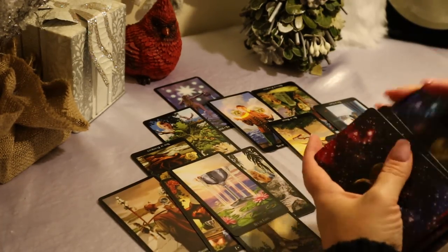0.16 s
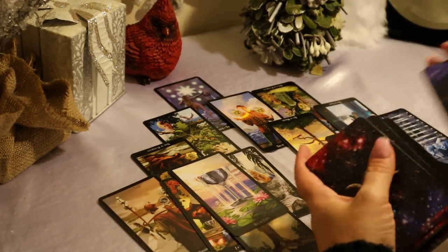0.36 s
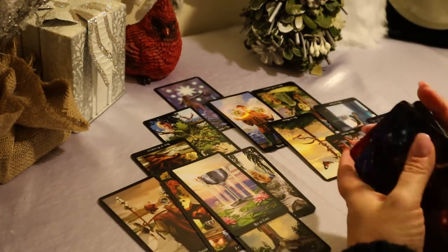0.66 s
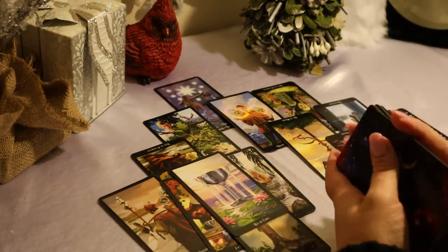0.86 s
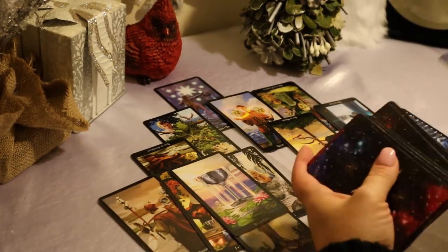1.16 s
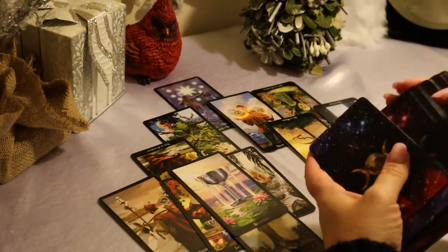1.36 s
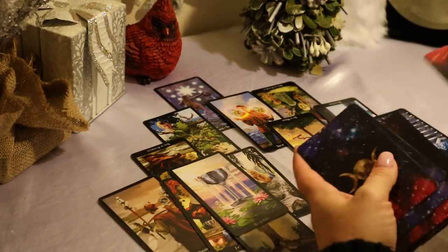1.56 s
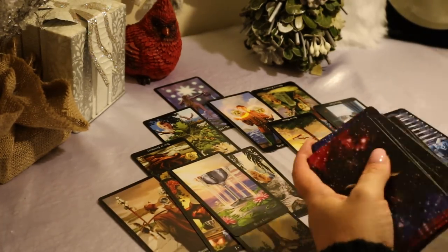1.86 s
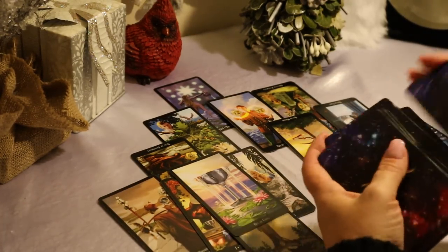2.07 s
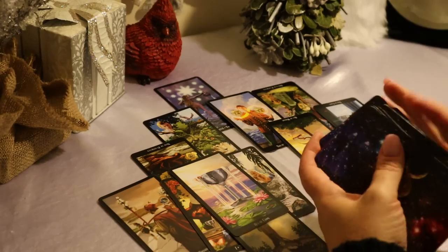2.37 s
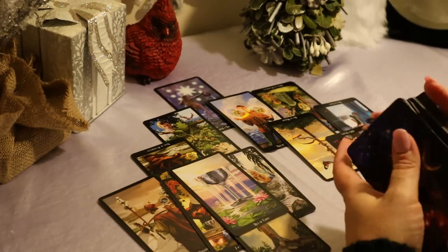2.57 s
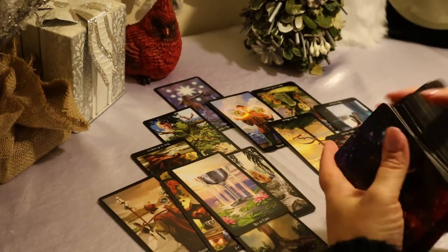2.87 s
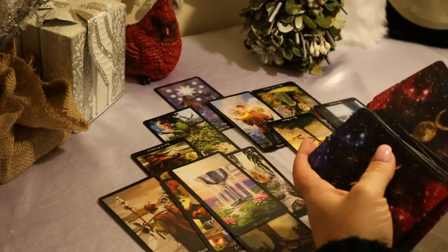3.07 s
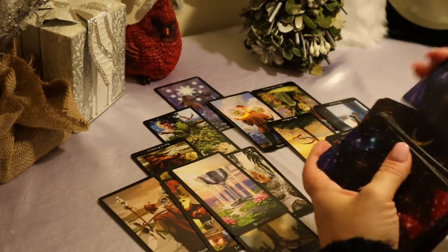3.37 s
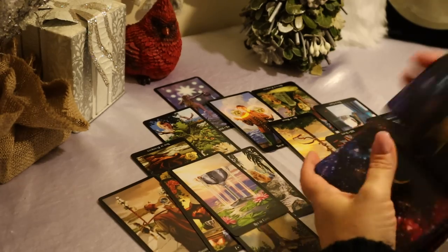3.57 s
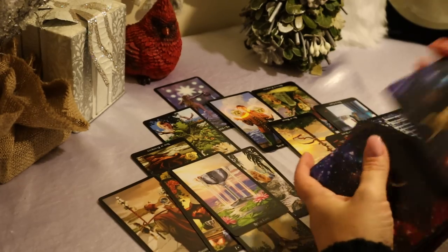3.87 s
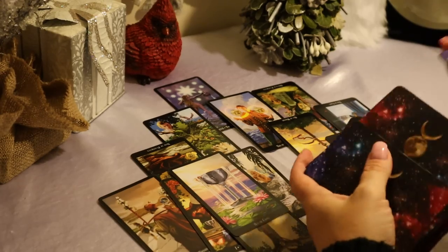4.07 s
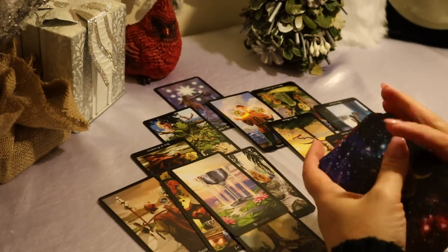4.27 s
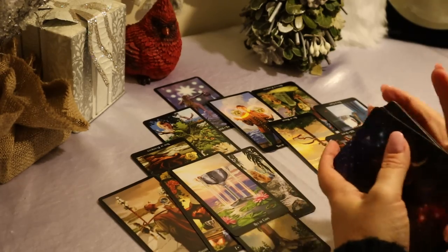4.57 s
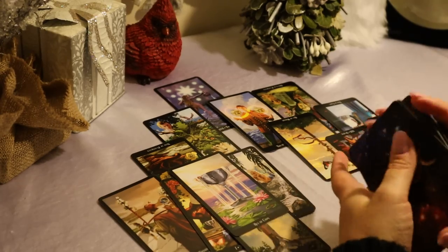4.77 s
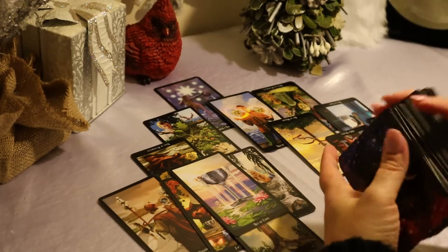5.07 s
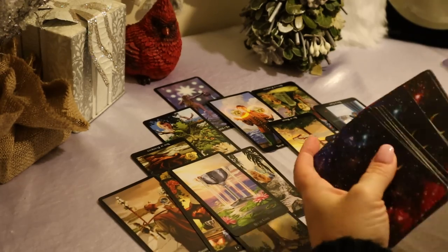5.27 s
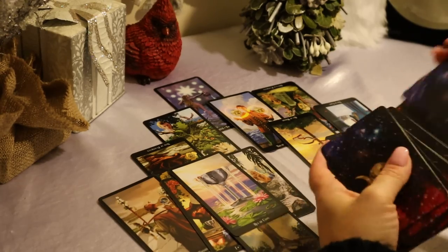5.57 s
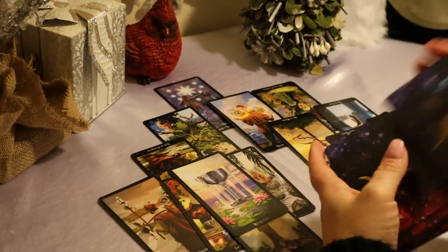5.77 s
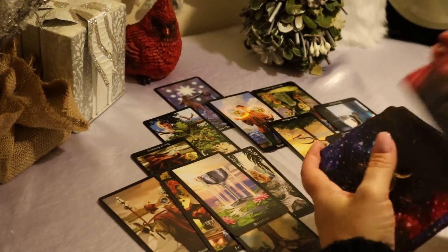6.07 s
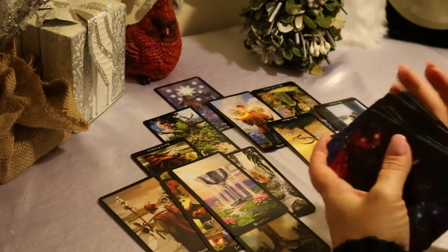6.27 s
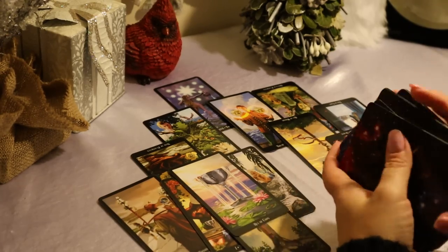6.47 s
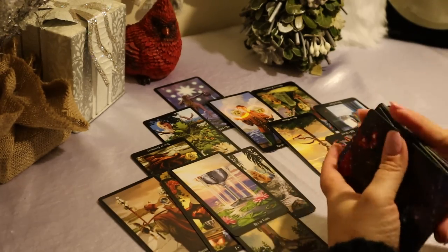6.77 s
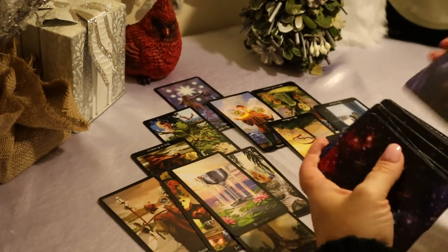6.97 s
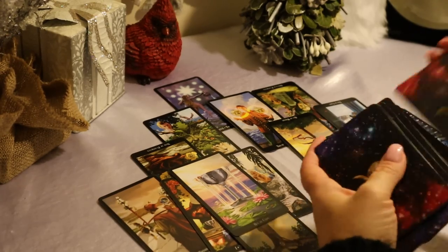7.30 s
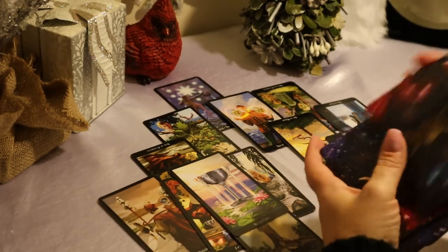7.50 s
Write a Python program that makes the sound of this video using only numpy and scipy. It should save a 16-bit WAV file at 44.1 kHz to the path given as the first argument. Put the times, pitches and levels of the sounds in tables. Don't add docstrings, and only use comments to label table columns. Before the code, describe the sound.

A deck of large stiff cards is shuffled overhand at close range. Packets slide with gritty, papery hiss, then edges tick and slap home with dry knocks. Hard cracks stand out near two, three and four seconds, followed by softer finger rustles and a near-still pause before more flicks around six seconds. Small furnished room, very short reflections, faint hum and microphone hiss, close stereo pickup.

```python
import sys
import numpy as np
from scipy import signal
from scipy.fft import rfft, irfft, next_fast_len
from scipy.io import wavfile
from scipy.ndimage import uniform_filter1d

SR = 44100
rng = np.random.default_rng(int(sys.argv[2]) if len(sys.argv) > 2 else 0)


def store_wav(level_fs):
    pcm = np.round(np.clip(np.atleast_2d(level_fs), -1, 1) * 32767)
    wavfile.write(sys.argv[1], SR, pcm.T.astype(np.int16))


def convert_level_to_amplitude(level_db):
    exponent = np.asarray(level_db, float) / 20
    return 10 ** exponent


N = 336924

# frequency in Hz, level in dB per Hz.
AIR_SPECTRUM = [(18, -16), (36, -1.5), (684, -6), (913, -8.5), (3310, -16), (9460, -28.5), (11400, -28),
                (12600, -27), (13700, -30), (16000, -69)]
AIR_DB = -55
ROOM_T60_S, ROOM_DB = 0.14, -15

# frequency in Hz, level in dB.
SCATTER_SPECTRUM = [(200, -22), (600, -20), (1200, -13), (2500, -10), (4500, -7), (9000, -3)]

# pitch in Hz, width in Hz, level in dB.
DECK_LOW_MODES = [(67.4, 44, -13), (162, 107, -7), (350.5, 39, -5.5), (530, 110, -4), (630, 100, -5),
                  (800, 70, -4), (1045, 90, -8)]
# pitch in Hz, width in Hz, level in dB.
DECK_HIGH_MODES = [(1396, 75, -3.5), (1710, 89, -4.5), (1800, 49, -6), (1960, 94, -5.5), (2170, 110, -8),
                   (2390, 130, -12), (2620, 93, -20), (3400, 160, -6)]

# frequency in Hz, level in dB.
RUB_SPECTRUM = [(60, -11.5), (300, -9.5), (620, -6.5), (1000, -8), (1800, -2), (2600, -4), (3500, -51),
                (6000, -34.5)]
# frequency in Hz, level in dB.
SCRAPE_SPECTRUM = [(2000, -29), (2900, -0.5), (5500, -3.5), (7500, -24.5)]
# frequency in Hz, level in dB.
EDGE_SPECTRUM = [(4500, -62), (6200, -4.5), (11000, -3.5), (13000, -4.5), (16000, -5.5)]

# start in seconds, level in dB, time to fade in seconds, edge hiss in dB relative.
SKIDS_OF_PACKETS = [(0.0, -50.5, 0.018, -6), (0.519, -39, 0.13, -5), (0.913, -46, .1, -1.5),
                    (1.23, -41.5, .03, 0), (1.763, -30, .12, -12), (2.102, -37, .12, 2),
                    (2.385, -32, 0.076, -1), (4.004, -46.5, 0.029, 7), (4.071, -43, .17, 1),
                    (6.21, -43.5, 0.049, 5.5), (7.308, -38, 0.058, 1)]
# start in seconds, level in dB, time to fade in seconds.
DECK_SETTLES = [
    (0.314, -26.5, 0.056),
    (2.171, -29, .06),
    (3.823, -27.5, .035),
    (4.165, -35, .04),
]
# start in seconds, length in seconds, first level in dB, last level in dB, edge hiss in dB relative.
DRIVEN_PACKETS = [
    (0.209, 0.1, -41, -50, 2),
    (1.427, 0.12, -50.5, -52.5, 3.5),
    (0.714, 0.091, -57, -54, 0.5),
    (2.577, 0.096, -58.5, -55, 1),
    (3.708, 0.024, -52, -44, 3),
    (3.297, 0.049, -35, -37.5, -2.5),
    (4.335, 0.024, -35.5, -32, 7.5),
    (5.577, .11, -48, -47, 3),
    (5.906, .035, -47, -47, -1),
]
# start in seconds, length in seconds, first level in dB, last level in dB, edge hiss in dB relative.
DRAWN_PACKETS = [(1.148, .075, -59, -55.5, 13), (4.326, .01, -51, -43, -7), (1.831, 0.03, -56, -55, -1),
                 (2.88, .24, -70.5, -59.5, 9), (3.391, .055, -49, -49, -5), (3.78, 0.039, -47, -48, 4.5),
                 (4.527, 0.17, -62, -62, 0.5), (5.118, 0.16, -68, -59, 4), (5.944, 0.041, -49.5, -56, 4),
                 (6.413, .13, -58, -58, 0), (6.975, .1, -62, -64, 6.5), (7.34, .07, -49, -48, 3)]
# peak in seconds, level in dB, times to rise and to fade in seconds, edge hiss in dB relative.
CARD_BRUSHES = [(0.134, -62, 0.054, .04, 0), (0.468, -53, .03, .035, -11), (0.599, -40.5, 0.047, .04, -11),
                (0.765, -46.5, 0.064, 0.052, -4), (0.248, -47, .06, .05, 9.5),
                (1.452, -44, .035, .09, 11.5), (1.54, -46.5, .08, 0.049, 4), (1.33, -62, .05, 0.042, 6),
                (1.005, -62.5, .05, 0.057, 9), (1.98, -64.5, 0.043, 0.043, 7), (1.697, -54, .04, .04, 2),
                (2.455, -48, .05, .03, -14), (2.655, -52, 0.057, 0.086, 3.5),
                (2.802, -51.5, 0.06, 0.036, 5.5), (3.28, -40.5, 0.023, .05, -17),
                (3.606, -62, 0.027, 0.059, 3.5), (3.744, -31.5, 0.025, 0.051, 1.5),
                (4.036, -31, 0.012, .045, -3), (4.246, -59, 0.021, 0.016, 13), (4.834, -55, 0.094, 0.12, 7),
                (4.966, -50, 0.056, 0.078, 5), (6.017, -39, .05, 0.042, 2),
                (6.249, -37.5, 0.028, 0.067, -12.5), (6.612, -58, 0.035, .2, 3.5)]
# peak in seconds, level in dB, time to rise in seconds, edge hiss in dB relative.
FINGER_RUSTLES = [(2.13, -42, .04, 4), (2.172, -45, .04, -3), (4.413, -49.5, .04, -8), (6.42, -52, .05, 3),
                  (6.51, -50, .1, 1), (7.346, -44, .05, 5), (5.69, -44, .05, 0), (7.405, -44, .07, 3),
                  (3.452, -44, .07, -2), (7.055, -60, .06, 6), (4.525, -54, 0.043, -1),
                  (4.575, -52, .05, -10), (4.65, -52, 0.12, 2.5), (4.697, -53, .03, 3),
                  (4.94, -62, 0.036, 8), (5.23, -54, .15, -3), (5.287, -54, .08, 12.5),
                  (6.285, -52, .04, -5), (6.72, -58, 0.037, 3)]

FADE_DB = 25
STRIKE_S, EASE_S = .002, 0.042
DRIVE_FADE_S, DRAW_FADE_S, RUSTLE_FADE_S = 0.043, 0.042, .045
SETTLE_EDGE_DB = -34.5
SCRAPE_DB, SCRAPE_PER_EDGE = 0.42, 0.43
DULLING = .4

# start in seconds, snap peak in dB, snap pitch in Hz, thud in dB relative.
EDGE_TICKS = [(0.2119, -23, 2540, -15.5), (0.2504, -29, 2560, -15), (0.5213, -28, 1960, -4.5),
              (1.4272, -36, 1810, -4), (1.4519, -21, 2460, -28), (2.1046, -26, 2180, -2),
              (2.1264, -27, 2130, -13), (2.417, -26.5, 2390, -12.5), (2.797, -41, 1890, -10.5),
              (3.12, -45.5, 1300, 1), (3.3339, -19, 1440, -28), (3.708, -39, 2860, -5.5),
              (4.0056, -37, 2130, -10.5), (4.0348, -20, 3600, -20), (4.0701, -12, 2500, -28),
              (2.618, -42, 3000, -20), (4.2433, -48, 3330, -25), (4.336, -21.5, 1980, -15.5),
              (5.4014, -48, 1470, -16), (5.5759, -44.5, 1550, -7), (5.907, -27, 3460, -37),
              (5.9404, -28.5, 1710, -14), (6.2111, -34, 1700, -9.5), (6.2446, -24.5, 2310, -25),
              (6.4018, -40.5, 2650, -10), (7.6334, -30.5, 1270, -12)]
# start in seconds, snap peak in dB, snap pitch in Hz, thud in dB relative.
FACE_FLICKS = [(0.5521, -20, 3480, -17), (0.7103, -42.5, 1920, -10), (1.4955, -34, 1590, -14),
               (1.7674, -24, 2300, -30), (1.8672, -37.5, 2100, -3.5), (2.1004, -31, 3370, -27),
               (2.1414, -30.5, 2390, 0), (2.4538, -27.5, 2920, -12.5), (3.2743, -40, 2100, -7),
               (3.3414, -16, 2620, -27.5), (3.7394, -22, 1560, -23), (3.824, -33.5, 1740, 4),
               (4.1634, -30, 1850, -6), (4.6516, -38.5, 1710, -17), (4.6887, -42.5, 1220, -13),
               (5.9314, -24, 2070, -18), (6.0163, -26.5, 2760, -19), (6.2514, -21.5, 2500, -24.5),
               (6.6134, -52, 1299, 8), (7.3831, -36.5, 1930, -6.5), (7.3966, -30.5, 1390, -9)]
# start in seconds, snap peak in dB, snap pitch in Hz, thud in dB relative.
PACKET_SLAPS = [(0.3137, -24, 1810, -5), (0.3214, -28, 2270, -2), (0.4658, -41.5, 1740, -12),
                (0.538, -34.5, 1560, 0.5), (0.6005, -32.5, 1170, 1), (0.9166, -33, 2510, -35),
                (1.2291, -33, 1420, -1.5), (1.5484, -30.5, 3730, -7), (1.6906, -47, 1740, -22),
                (1.762, -1.5, 4000, -54), (2.1695, -25.5, 1800, -2.5), (2.3856, -14.5, 1800, -19),
                (2.5764, -35, 4360, -19), (3.2974, -10.5, 2800, -52), (3.3104, -13.5, 1960, -32),
                (3.4456, -28, 1420, -23), (3.7484, -23.5, 2090, -18), (4.4118, -31.5, 1570, -22),
                (4.5174, -40, 1180, -7), (4.57, -36, 2340, -28), (5.6161, -32.5, 2170, -8.5),
                (5.6868, -24.5, 3700, -20), (7.3033, -28.5, 1900, -15.5)]
TICK_TOP_DB, FLICK_TOP_DB, SLAP_TOP_DB = -3, -10, -25
CHATTER_T60_S = 0.033


def unit(x):
    return x / np.sqrt(np.mean(x ** 2))


def colour(x, points):
    hz, db = np.transpose(points)
    size = next_fast_len(x.shape[-1])
    f = np.fft.rfftfreq(size, 1 / SR) + 1
    gain = convert_level_to_amplitude(np.interp(np.log(f), np.log(hz), db))
    return irfft(rfft(x, size) * gain, size)[..., :x.shape[-1]]


def ring(x, hz, width):
    return signal.lfilter(*signal.iirpeak(hz, hz / width, fs=SR), x)


def body(x, modes, grip=1):
    return sum(convert_level_to_amplitude(db) * ring(x, grip * hz, width) for hz, width, db in modes)


def walk(rate):
    k = int(SR / rate)
    held = np.repeat(rng.standard_normal(N // k + 1), k)
    return 1.175 * uniform_filter1d(held, k)[:N]


def grit(shape, spread_db):
    jumps = convert_level_to_amplitude(spread_db * rng.exponential(size=shape))
    return unit(rng.standard_normal(shape) * jumps)


def air():
    common, own = rng.standard_normal(N), rng.standard_normal((2, N))
    hum = colour(common, [(30, 3.5), (150, -3.5), (400, -5), (1000, -57)])
    hiss = colour(own, [(30, -19), (100, 3.5), (300, 1.5), (1000, 2.5)])
    return convert_level_to_amplitude(AIR_DB + 1.48 * walk(3.105)) * unit(colour(hum + hiss, AIR_SPECTRUM))


def echoes():
    t = np.arange(SR // 2) / SR
    tail = rng.standard_normal((2, len(t))) * convert_level_to_amplitude(-60 * t / ROOM_T60_S) * (t > .004)
    tail = colour(tail, [(200, -0.5), (2000, 0.0), (4000, -4.5), (12000, -6.5)])
    return convert_level_to_amplitude(ROOM_DB) * unit(tail) / np.sqrt(len(t))


def reach_ports(cards):
    direct, scattered = cards[0], colour(cards[1], SCATTER_SPECTRUM)
    delay_s = 2.2e-5
    turn = np.exp(-2j * np.pi * np.fft.rfftfreq(N) * SR * delay_s)
    left = irfft(rfft(direct) * turn, N)
    left = colour(left, [(150, 0.0), (600, -1.0), (2500, -4.5), (8000, -2.5)])
    room = signal.fftconvolve(direct[None], echoes(), axes=1)[:, :N]
    return np.array([left + scattered, direct - scattered]) + room


def creak():
    start_s, end_s, level_db = 5.72, 5.89, -63.
    t = np.arange(N) / SR
    swell = np.sin(np.pi * np.clip((t - start_s) / (end_s - start_s), 0, 1))
    return convert_level_to_amplitude(level_db) * swell * unit(ring(rng.standard_normal((2, N)), 1550., 60.))


def strokes():
    return ([(s, STRIKE_S, 0, fade, db, db, edge) for s, db, fade, edge in SKIDS_OF_PACKETS]
            + [(s, STRIKE_S, 0, fade, db, db, SETTLE_EDGE_DB) for s, db, fade in DECK_SETTLES]
            + [(s, STRIKE_S, hold, DRIVE_FADE_S, a, b, edge) for s, hold, a, b, edge in DRIVEN_PACKETS]
            + [(s, EASE_S, hold, DRAW_FADE_S, a, b, edge) for s, hold, a, b, edge in DRAWN_PACKETS]
            + [(s, rise, 0, fade, db, db, edge) for s, db, rise, fade, edge in CARD_BRUSHES]
            + [(s, rise, 0, RUSTLE_FADE_S, db, db, edge) for s, db, rise, edge in FINGER_RUSTLES])


def pressure():
    t = np.arange(N) / SR
    power = np.zeros((4, N))
    for s, rise, hold, fade, first_db, last_db, edge_db in strokes():
        on = slice(max(int((s - 2 * rise) * SR), 0), int((s + hold + 2 * fade) * SR))
        rising = FADE_DB * np.clip((s - t[on]) / rise, 0, None)
        fading = FADE_DB * np.clip((t[on] - s - hold) / fade, 0, None)
        held_db = np.interp(t[on], [s, s + hold + 1 / SR], [first_db, last_db])
        rub_db = held_db - rising - fading
        scrape_db = SCRAPE_DB + SCRAPE_PER_EDGE * edge_db
        packed = np.clip(-(scrape_db + 12.0) / 8.6, 0, .85)
        shares = packed, 1 - packed, convert_level_to_amplitude(2 * scrape_db), convert_level_to_amplitude(2 * (edge_db - DULLING * fading))
        power[:, on] += [share * convert_level_to_amplitude(2 * rub_db) for share in shares]
    return np.sqrt(power)


def slides():
    waver_db = 1.25 * walk(30.) + 2.2 * walk(90.) + 2.1 * walk(250.)
    slips = grit((2, N), spread_db=1.54) * convert_level_to_amplitude(waver_db)
    rub = colour(slips, RUB_SPECTRUM)
    deck_ring = unit(body(rub, DECK_LOW_MODES[3:] + DECK_HIGH_MODES))
    scrape = unit(colour(slips, SCRAPE_SPECTRUM))
    draught = unit(colour(slips, [(20, -35), (45, 5), (90, -17.0), (200, -23)]))
    edge_hiss = unit(colour(slips, EDGE_SPECTRUM)) + convert_level_to_amplitude(-17.0) * draught
    layers = deck_ring, unit(rub), scrape, edge_hiss
    return convert_level_to_amplitude(-1.0) * sum(gain * layer for gain, layer in zip(pressure(), layers))


def knocks():
    size = SR // 7
    fade = convert_level_to_amplitude(-60 * np.arange(size) / SR / CHATTER_T60_S)
    kinds = (EDGE_TICKS, TICK_TOP_DB), (FACE_FLICKS, FLICK_TOP_DB), (PACKET_SLAPS, SLAP_TOP_DB)
    blows = [(*row, top_db) for rows, top_db in kinds for row in rows]
    chatter = grit((len(blows), 2, size), spread_db=3.5)
    grips = 1 + 0.035 * rng.standard_normal(len(blows))
    treble = signal.butter(2, [5000, 15000], "bandpass", fs=SR)
    out = np.zeros((2, N + size))
    for (s, snap_db, hz, thud_db, tick_db), slips, grip in zip(blows, chatter, grips):
        blow = 0.5 * slips * fade
        blow[0, 0] += 3.2
        snap_band = signal.butter(2, [hz / 2.05, hz * 1.91], "bandpass", fs=SR)
        crack = signal.lfilter(*snap_band, blow)
        damping = np.clip(0.14 + 0.0038 * tick_db, .02, .2)
        edge_ring = 4.1 * ring(blow, hz, damping * hz)
        snap = crack + edge_ring + 1.86 * body(crack, DECK_HIGH_MODES, grip)
        thud = body(blow, DECK_LOW_MODES, grip)
        tick = signal.lfilter(*treble, blow)
        levels_db = 0, thud_db + 10.5, tick_db + 9.5
        sound = sum(convert_level_to_amplitude(db) * x / np.abs(x[0]).max() for db, x in zip(levels_db, (snap, thud, tick)))
        i = int(s * SR)
        out[:, i:i + size] += convert_level_to_amplitude(snap_db) * sound
    return out[:, :N]


def scene():
    cards = slides() + knocks() + creak()
    return reach_ports(convert_level_to_amplitude(-1.5) * cards) + air()


def low_pass(x):
    return signal.sosfilt(signal.butter(12, 16710, fs=SR, output="sos"), x)


def record(dry):
    mid = colour(dry[0] + dry[1], [(12000, -4), (13500, -11.0), (15500, -25), (16600, -38)])
    side_points = [(60, -16.5), (300, -0.5), (4000, 1.5), (13000, 0), (15500, -46), (16500, -30)]
    side = colour(dry[0] - dry[1], side_points)
    wide = np.array([mid + side, mid - side])
    rounded = np.sign(wide) * (.5 + .5 * np.tanh(2 * abs(wide) - 1))
    limited = np.where(abs(wide) > .5, rounded, wide)
    return low_pass(limited)


dry = scene()
out = record(dry)
store_wav(out)
```